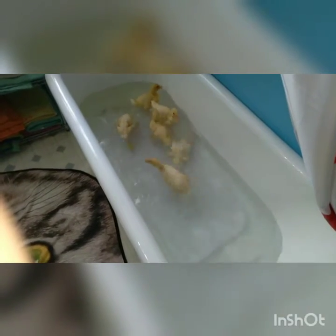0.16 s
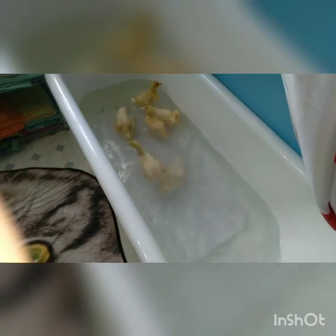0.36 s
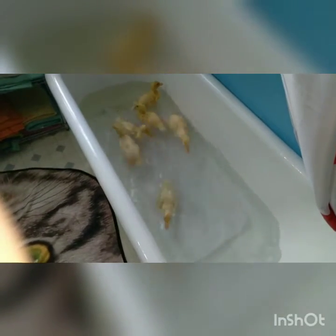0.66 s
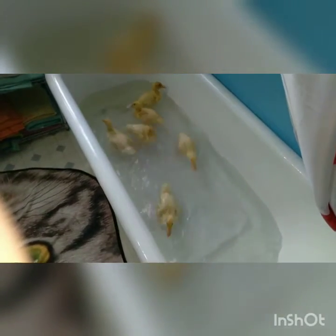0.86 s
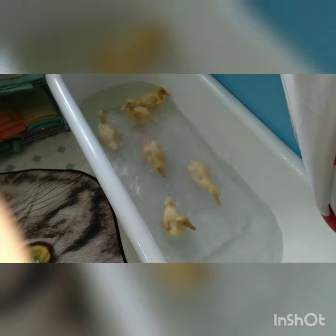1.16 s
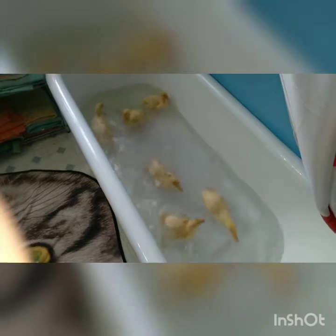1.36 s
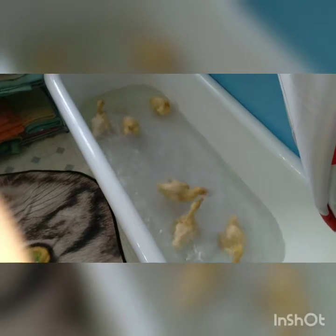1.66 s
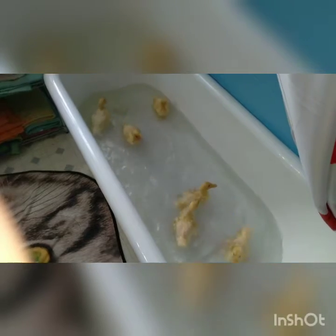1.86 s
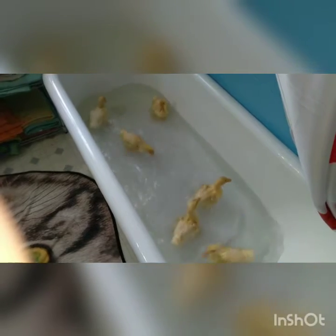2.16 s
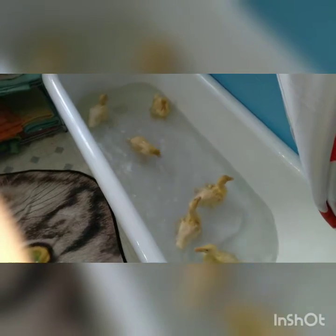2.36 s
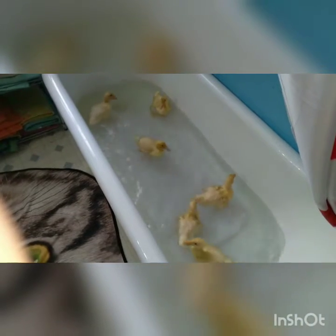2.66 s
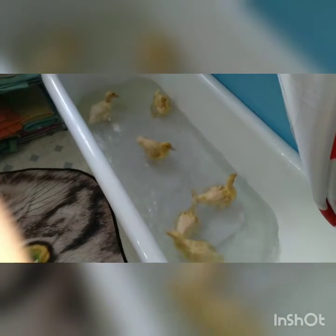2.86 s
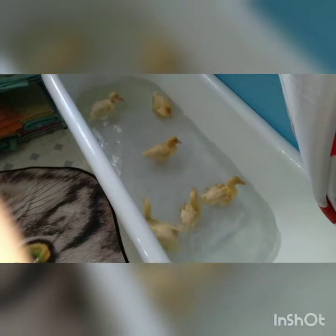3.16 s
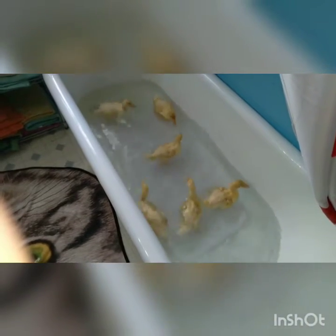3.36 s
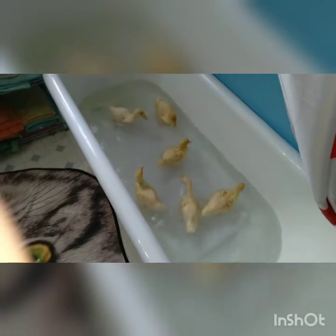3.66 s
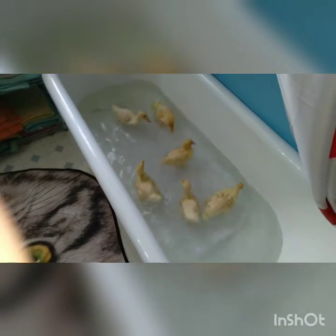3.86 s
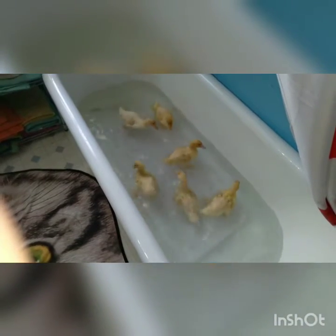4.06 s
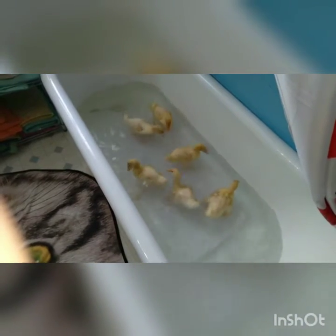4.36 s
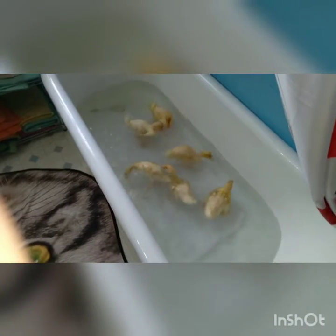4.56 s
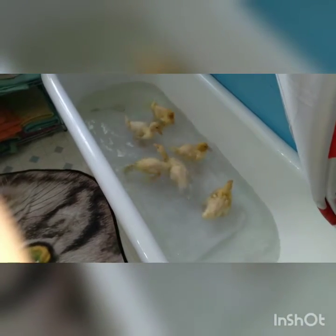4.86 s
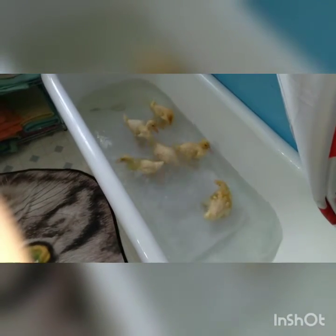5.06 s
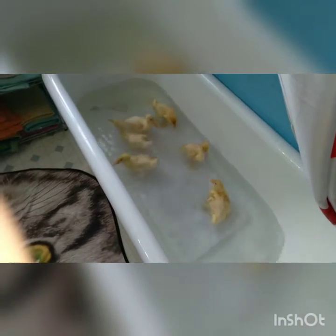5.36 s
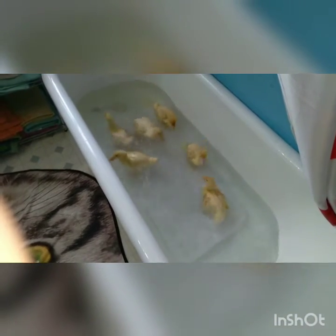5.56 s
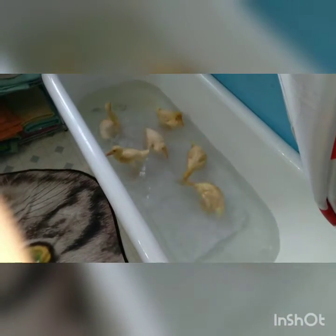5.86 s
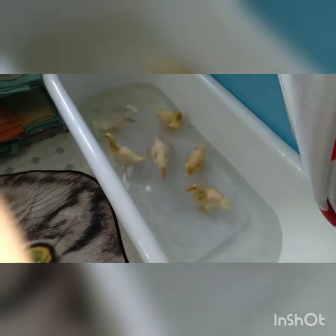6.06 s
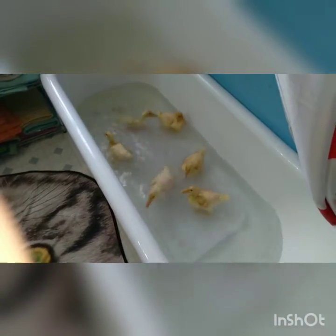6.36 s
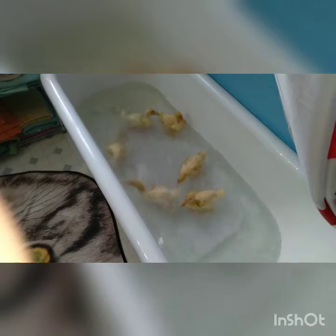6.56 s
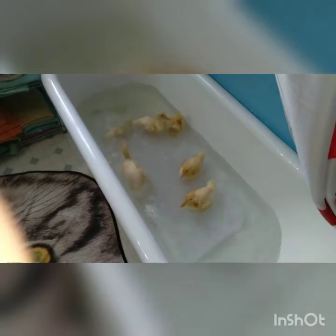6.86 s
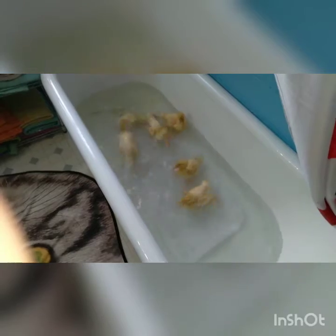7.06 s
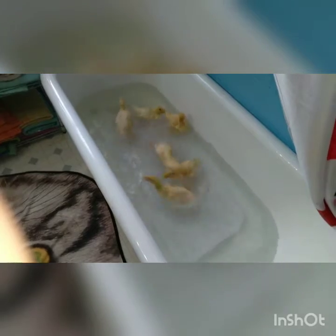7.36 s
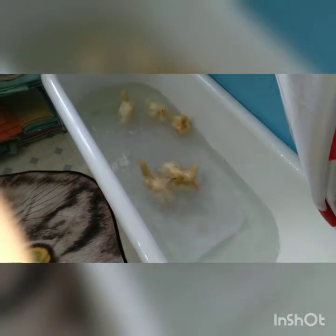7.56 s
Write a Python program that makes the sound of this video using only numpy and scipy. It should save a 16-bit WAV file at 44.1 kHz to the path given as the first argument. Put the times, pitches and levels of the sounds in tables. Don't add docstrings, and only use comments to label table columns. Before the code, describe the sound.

Thin whistled duckling peeps over lively paddling, with crackling spray, bubbly gurgles and droplets in a bathtub, echoing briefly off enamel and tile.

```python
import sys
import numpy as np
from scipy import signal
from scipy.fft import rfft, irfft
from scipy.io import wavfile

SR = 44100
rng = np.random.default_rng(int(sys.argv[2]) if len(sys.argv) > 2 else 0)


def decibels_to_gain(level_db):
    exponent = np.asarray(level_db, float) / 20
    return 10 ** exponent


def generate_wav(signal):
    frames = np.transpose(np.atleast_2d(signal))
    scaled = np.clip(frames, -1, 1) * 32767
    pcm = np.round(scaled).astype(np.int16)
    wavfile.write(sys.argv[1], SR, pcm)


N = 339646

# [Hz, dB per Hz]
HUSH_SPECTRUM = [(18, -58), (30, -4.5), (221, -2), (394, -11.5), (666, -14), (1190, -38), (12000, -45),
                 (16000, -53)]
HUSH_DB = -69.5
# [Hz, dB per Hz]
SPRAY_SPECTRUM = [(880, -8), (1500, -6.5), (2390, 4.5), (2830, -27), (3180, 4), (5020, -6), (10200, 0),
                  (13100, -12), (15100, -13), (16000, -100)]
# [Hz, 0 to 1]
LEFT_RIGHT_LIKENESS = [(100, 0.72), (250, 1), (500, 0.59), (1000, 0.033), (4000, 0.0077)]
# [Hz, Hz, dB]
TUB_WALL_MODES = [(97, 42, -18), (155, 21, 3), (208, 23.5, -2.5), (282, 180, -11)]
# [Hz, s]
ROOM_T60 = [(200, 0.33), (1000, 0.35), (3000, 0.22), (10000, 0.098)]
# [s, dB, dB]
TUB_BOUNCES = [
    (.0041, -18, -7),
    (.0093, -16, -7),
    (0.0161, -10, -16),
]
# [Hz, dB]
PORT_COLOUR = [(60, 5), (95, 1.5), (150, 0), (240, 1), (380, 1), (600, 0.5), (950, 1), (1500, -4),
               (2380, -5.5), (3770, -0.5), (5980, 4), (9470, -4), (15000, -2.5)]
PORT_CUTOFF_HZ = 16100

# [s, dB, s]
SHOVES = [(0.06, -38.5, 0.15), (0.81, -42, 0.094), (1.46, -40.5, 0.24), (2.38, -60.5, 0.11),
          (3.26, -49, 0.16), (4.87, -66.5, 0.23), (6.02, -56, 0.066), (6.24, -45.5, 0.097),
          (6.57, -36.5, 0.033), (7.05, -49, 0.4), (7.27, -51.5, 0.056), (7.44, -44, 0.096)]
SHOVE_FADE_DB_PER_S, STILL_DB = 77.5, -79
# [s, dB, s]
KICKS = [(0.04, -38, 0.32), (.11, -41.5, .01), (0.23, -34.5, 0.027), (.39, -42.5, 0.014), (0.476, -42, .01),
         (.65, -38, .01), (0.71, -30.5, 0.11), (.82, -51, 0.15), (1.02, -40, 0.044), (1.24, -31.5, 0.05),
         (1.37, -30.5, 0.52), (1.52, -36, 0.14), (1.72, -37.5, 0.054), (2.0, -43.5, 0.18), (2.35, -49.5, 1),
         (2.63, -56.5, 0.15), (2.89, -47.5, 0.16), (3.05, -40, 0.064), (3.135, -34.5, 0.052),
         (3.19, -51, 0.037), (3.31, -42, 0.099), (3.39, -68.5, 0.08), (3.72, -55.5, 0.062),
         (3.9, -46, 0.018), (4.12, -54, 0.06), (4.29, -53.5, .06), (4.425, -67, 0.012), (4.55, -57.5, 0.12),
         (4.68, -45.5, 0.06), (4.84, -36, 0.022), (5.06, -35.5, 0.0054), (5.3, -41.5, 0.2),
         (5.55, -43.5, 0.1), (5.995, -45.5, 0.048), (6.08, -54, .05), (6.18, -40, 0.088),
         (6.38, -38, 0.012), (6.5, -39.5, 0.18), (6.56, -31, 0.011), (6.66, -35, 0.3), (6.72, -32, 0.033),
         (6.84, -29.5, 0.016), (6.95, -35.5, .1), (7.05, -48, 0.15), (7.13, -35.5, 0.049),
         (7.25, -38, 0.049), (7.35, -37, 0.23), (7.45, -33.5, 0.11), (7.58, -37.5, 0.055)]
KICK_FADE_DB_PER_S = 77
# [s, dB, Hz]
CHURN = [(0, -42, 660), (0.95, -44, 910), (1.33, -38.5, 1040), (1.78, -41.5, 900), (2.08, -68.5, 890),
         (2.87, -99, 1200), (3.15, -43.5, 910), (3.42, -53.5, 905), (3.7, -55.5, 905), (3.82, -67, 1320),
         (4.52, -76, 1390), (5.1, -57, 1120), (5.36, -51, 1210), (5.93, -70.5, 1410), (6.1, -46, 800),
         (6.4, -58, 1000), (6.63, -44, 884), (7.7, -39, 1070)]
MIST_DB, MIST_FOLLOWS = -45, 0.99
# [s, dB, Hz]
FLOOR_BUMPS = [
    (4.85, -52.5, 96),
    (5.29, -46, 67.6),
]

# [s, dB, Hz]
DROPLETS = [(0.2304, -20, 8300), (0.3903, -24.5, 4090), (0.474, -23.5, 6250), (0.647, -16.5, 6800),
            (0.706, -19, 8000), (1.5225, -5, 7100), (1.725, -16, 7540), (1.8304, -20, 4260),
            (1.9203, -21.5, 8600), (2.3522, -31, 3850), (3.047, -23, 7140), (3.1278, -18, 7800),
            (3.905, -24.5, 7550), (4.4223, -38, 8600), (4.5524, -31, 8400), (5.0963, -11, 7950),
            (5.194, -20, 12700), (5.9897, -38, 4030), (6.0753, -22.5, 7750), (6.1779, -37, 8400),
            (6.8997, -15, 7400), (7.127, -17.5, 8650), (7.247, -15, 13800)]
# [s, dB]
BEADS = [(0.049, -15.5), (0.2344, -25), (0.283, -18), (0.9213, -46), (1.472, -16.5), (1.767, -22),
         (2.276, -28), (3.697, -35.5), (4.8319, -6), (4.984, -20.5), (5.0285, -5), (5.1386, -19.5),
         (5.34, -14.5), (5.381, -17), (5.481, -22), (5.5684, -26), (5.649, -28), (6.1765, -14),
         (6.242, -19.5), (6.557, -24), (6.651, -13.5), (6.719, -14), (6.8338, -10), (6.865, -33),
         (7.2467, -8), (7.568, -19)]
BEAD_HZ, BEAD_SPREAD = 9930, 0.1
# [s, dB, Hz]
TICKS = [(0.5257, -24, 10200), (0.5374, -28, 11700), (0.9705, -29, 8130), (1.2371, -20, 4050),
         (1.3523, -23, 8500), (2.4239, -33.5, 11900), (2.6219, -37, 8250), (2.8794, -36, 8520),
         (3.1911, -23.5, 10000), (3.4565, -41, 8610), (3.6164, -35.5, 5640), (3.6491, -40, 10800),
         (3.7364, -32, 5960), (3.9394, -28.5, 5920), (4.0292, -46, 13800), (4.14, -31, 5610),
         (4.3969, -46, 6900), (4.4643, -43, 8750), (4.5178, -37, 7100), (4.5984, -35.5, 11100),
         (4.6743, -35, 11700), (4.7666, -33.5, 11400), (5.2924, -33, 8500), (5.7196, -32, 5970),
         (5.8381, -38.5, 10500), (5.9364, -38, 7500), (6.0586, -28, 7920), (6.1135, -36, 10300),
         (6.305, -31, 10700), (6.3463, -29.5, 10200), (6.4975, -23, 7700), (7.04, -20, 10200),
         (7.208, -19.5, 4840), (7.2994, -34, 4530), (7.343, -28, 8550), (7.5194, -23, 9400),
         (7.585, -19.5, 10200)]
# [s, dB, Hz]
SLAPS = [(0.113, -18, 2270), (0.226, -17.5, 2010), (0.2859, -20, 2500), (0.4738, -20.5, 1980),
         (0.5386, -24.5, 2440), (0.6445, -33, 2370), (0.6782, -17.5, 2150), (0.9743, -38, 1950),
         (1.289, -13, 1720), (1.65, -20, 2480), (3.127, -22, 2150), (3.1415, -27, 1880),
         (3.1788, -19.5, 2480), (3.1923, -29, 2340), (3.3055, -23, 2680), (3.389, -31, 3150),
         (5.074, -29, 1900), (5.103, -29, 1900), (5.34, -26, 1500), (3.087, -27, 1800), (5.9898, -29, 2520),
         (6.1758, -39, 2580), (6.3802, -28, 2540), (6.4962, -29, 1240), (6.555, -21.5, 1350),
         (6.7096, -21, 1210), (6.8324, -31, 1300), (6.858, -18, 1700), (6.942, -20, 1760),
         (7.2474, -26, 2350), (7.3423, -18.5, 2900)]
# [s, dB, Hz]
PLOPS = [(0.031, -30, 551), (0.11, -28, 1140), (0.229, -31.5, 672), (0.284, -30, 1450), (0.311, -28, 1560),
         (0.647, -30.5, 595), (0.688, -24, 1470), (0.88, -30.5, 726), (1.289, -27, 1595), (1.417, -33, 696),
         (1.64, -29.5, 1310), (2.348, -43, 683), (2.459, -36, 602), (3.076, -39, 1106), (3.146, -31, 982),
         (3.105, -42, 1000), (3.17, -35, 946), (3.25, -39, 1640), (3.456, -45, 895), (3.506, -36, 917),
         (3.869, -44, 1630), (5.383, -27.5, 1800), (5.338, -39, 807), (5.48, -41.5, 704),
         (6.178, -30.5, 968), (6.378, -35, 934), (6.555, -34, 1015), (6.854, -27.5, 1370),
         (6.945, -30, 1615), (7.067, -29.5, 1275), (7.203, -31, 1350), (7.247, -31, 585),
         (7.348, -28.5, 1200), (7.407, -34.5, 685), (7.495, -36, 2430)]
DRIPS_PER_S, DRIP_OVER_CHURN_DB = 14, 3
# [s, s, Hz, Hz, dB]
WARBLES = [(0.354, 0.25, 603, 609, -49.5), (2.351, 0.064, 4340, 4070, -56), (2.454, 0.078, 591.6, 896, -52),
           (3.21, 0.027, 524, 650, -50.5), (3.3, 0.048, 965, 802, -45.5), (3.375, 0.02, 853, 1020, -46),
           (3.575, 0.11, 301, 447, -60.5), (3.635, 0.051, 853, 844, -56), (3.738, 0.027, 1310, 1340, -52),
           (5.045, 0.05, 1233, 1183, -51), (4.23, 0.13, 331, 327, -68), (4.78, .11, 679, 707, -56),
           (5.1, 0.091, 533, 497, -54), (5.189, 0.033, 926, 1360, -48.5), (5.479, 0.051, 703, 724, -51.5),
           (6.44, 0.07, 1286, 1190, -44), (6.561, 0.104, 769, 691, -41.5), (7.063, 0.065, 1197, 1774, -39),
           (7.222, 0.079, 1008, 592, -42), (7.483, 0.11, 689, 701, -42), (7.485, 0.02, 1300, 1750, -36),
           (5.365, .025, 1050, 1400, -48.5), (5.405, 0.032, 920, 1030, -55), (4.981, 0.027, 800, 960, -57),
           (5.03, .025, 1790, 2400, -47), (6.859, .03, 620, 602, -39), (5.977, 0.14, 697, 623, -54),
           (3.268, .03, 710, 1610, -47), (3.185, .015, 570, 470, -47), (3.475, .02, 1040, 910, -51)]

# [s, s, Hz, Hz, dB]
SQUEAKS = [
    (.048, .012, 2800, 2310, -34),
    (.086, .018, 2900, 2410, -32),
    (2.102, .016, 2600, 1910, -42),
    (2.304, .012, 2550, 2010, -41),
    (3.036, .014, 2300, 1510, -48),
    (3.041, .022, 2310, 3210, -47),
    (4.298, .017, 2850, 1910, -45),
    (6.65, .012, 2250, 2750, -36),
]
# [s, s, Hz, dB]
PIPS = [(0.006, 0.028, 3361, -19.5), (1.038, 0.033, 2880, -29), (1.995, .04, 3421, -45),
        (2.084, 0.038, 3421, -47), (2.202, 0.046, 3321, -50), (2.603, 0.042, 3381, -51),
        (2.872, .03, 3481, -54), (3.13, 0.027, 3061, -31), (4.112, .03, 3481, -54),
        (6.158, 0.046, 2681, -38), (6.662, .028, 3461, -30), (7.468, 0.012, 2041, -28),
        (7.577, 0.016, 2880, -27.5)]
PIP_BEND_HZ_PER_S = 6160
# [s, s, Hz, dB, share
PEEPS = [(0.012, 0.048, 2756, -28, 0.36), (0.051, 0.052, 3000.0, -30.5, 1.5),
         (0.229, 0.058, 3130, -34, 0.51), (0.758, 0.065, 2970, -27, 0.46),
         (0.996, 0.056, 3534, -18, 0.12), (1.212, 0.052, 2620, -28.5, 0.6),
         (1.347, 0.056, 3027, -19, 0.38), (1.538, 0.062, 3350, -15, 0.5),
         (1.896, 0.038, 2395, -42, 0.25), (1.966, 0.044, 2770, -39, 0.13),
         (2.047, 0.032, 2600.0, -32.5, 0.17), (2.187, 0.04, 2543, -30, 0.57),
         (2.252, 0.0342, 2595, -37.5, 0.18), (2.254, 0.058, 3445, -40.5, 0.6),
         (2.584, 0.069, 2710, -44, 0.78), (2.756, 0.048, 3020, -43, 0.3),
         (2.788, 0.059, 2950, -37.5, 0.54), (2.946, 0.066, 2574, -37.5, 0.8),
         (2.973, 0.036, 3210, -42, 0.6), (3.089, 0.032, 2850, -31.5, 0.2),
         (3.532, 0.089, 2570, -48, 0.87), (3.654, 0.057, 2864, -35, 0.15),
              (3.707, 0.074, 2974, -35.5, 0.72), (3.878, 0.068, 3066, -35, 0.68),
              (4.071, 0.063, 2797, -28.5, 0.72), (4.241, 0.064, 3024, -31.5, 0.17),
              (4.439, 0.063, 2320.0, -43.5, 0.67), (4.62, 0.056, 3170, -39, 0.53),
              (4.639, 0.042, 2540.0, -40.5, 0.67), (4.708, 0.053, 2663, -36, 0.79),
              (4.895, 0.056, 2857, -38, 0.75), (5.154, 0.053, 2850, -35, 0.8),
              (5.261, 0.051, 2696, -37, 0.44), (5.446, 0.056, 2727, -31, 0.16),
              (5.48, 0.066, 2880, -35.5, 0.28), (5.634, 0.041, 2394, -39, 0.18),
              (5.671, 0.066, 3037, -34.5, 0.74), (5.82, 0.042, 2663, -37, 0.29),
              (5.838, 0.054, 3180, -33.5, 0.53), (5.935, 0.06, 2570, -42, 0.22),
              (6.64, 0.056, 2850, -36.5, 0.5), (6.857, 0.04, 2380.0, -33.5, 0.15),
              (7.15, 0.069, 2850, -34, 0.61), (7.336, 0.026, 2970, -31, 0.37)]
REST_HZ = 1940
# [Hz, dB]
BEAK = [(1400, -13), (2100, -2), (2600, -4), (3300, -8.5), (4300, -27), (5500, 4.5), (6800, 3), (10000, 11)]
BASIN_HZ, BASIN_WIDTH_HZ, BASIN_DB = 2320, 59, -10
VOICE_WET_DB = -0.5


def rms_one(x):
    return x / np.sqrt(np.mean(x ** 2) + 1e-20)


def at_hz(points, hz):
    table_hz, values = np.array(points).T
    return np.interp(np.log(hz), np.log(table_hz), values)


def in_time(rows):
    s, *columns = np.transpose(rows)
    return [np.interp(np.arange(N) / SR, s, c) for c in columns]


def drift(rate_hz):
    r = np.exp(-80 * np.pi * rate_hz / SR)
    white = rng.standard_normal(N // 40 + 2002)
    slow = signal.lfilter([1], [1, -2 * r, r * r], white)[2000:]
    return np.interp(np.arange(N) / 40, np.arange(len(slow)), rms_one(slow))


def resonate(x, hz, width_hz):
    r = np.exp(-np.pi * width_hz / SR)
    top = np.array([1, 0, -1]) * (1 - r * r) / 2
    return signal.lfilter(top, [1, -2 * r * np.cos(2 * np.pi * hz / SR), r * r], x + 1e-18)


def add(track, s, sound):
    i = round(s * SR)
    track[..., i:i + sound.shape[-1]] += sound[..., :N - i]


def banded_noise(spectrum, patchy_db, level_db):
    out, power, together = 0, 0, drift(8.1)
    edges = 21000 / 2 ** np.arange(0, np.log2(21000 / spectrum[0][0]), .5)[::-1]
    white = rng.standard_normal((2, 2, N))
    for k, (low, high) in enumerate(zip(edges, edges[1:])):
        band = signal.butter(2, [low, high], "band", fs=SR, output="sos")
        mid, side = signal.sosfilt(band, white[k % 2])
        hz = np.sqrt(low * high)
        alike = np.clip(at_hz(LEFT_RIGHT_LIKENESS, hz), -1, 1)
        flicker_db = patchy_db * (0.51 * together + drift(15.1))
        gain = decibels_to_gain(at_hz(spectrum, hz) + level_db(hz) + flicker_db)
        out = out + gain * (np.sqrt(1 + alike) * mid + np.sqrt(1 - alike) * side * [[1], [-1]])
        power += decibels_to_gain(2 * at_hz(spectrum, hz)) * 4 * (high - low) / SR
    return out / np.sqrt(power)


def room_hush():
    return banded_noise(HUSH_SPECTRUM, 1.5, lambda hz: HUSH_DB)


def swells(rows, fade_db_per_s, under_db):
    t = np.arange(0, N + 64, 64) / SR
    total = 0
    for s, db, build_s in rows:
        climb_db = 20 * (s - t) / max(build_s, 1e-3)
        total = total + decibels_to_gain(2 * (db - np.maximum(climb_db, fade_db_per_s * (t - s))))
    return 10 * np.log10(np.interp(np.arange(N) / SR, t, total) + decibels_to_gain(2 * under_db))


def grains(per_s, spread_db):
    sizes = decibels_to_gain(spread_db * np.minimum(rng.exponential(1, N), 5)) * rng.choice([-1, 1], N)
    side = decibels_to_gain(rng.normal(0, 2.6, N) * [[1], [-1]])
    return sizes * (rng.random(N) < per_s / SR) * side


def bubbling(per_s, low_hz, high_hz, cycles, spread_db, common_hz, octave_db):
    clicks = grains(per_s * decibels_to_gain(5.0 * drift(12)), spread_db)
    dealt = rng.integers(0, 11, N)
    out = 0
    for k, hz in enumerate(np.geomspace(low_hz, high_hz, num=11)):
        gain = decibels_to_gain(octave_db * np.abs(np.log2(hz / common_hz)))
        out = out + resonate(clicks * (dealt == k) * gain, hz, hz / cycles)
    return rms_one(out)


def tub_hum(surge_db):
    push = rng.standard_normal(N) + .15 * rng.standard_normal((2, N))
    modes = sum(decibels_to_gain(db) * resonate(push, hz, w) for hz, w, db in TUB_WALL_MODES)
    return decibels_to_gain(surge_db + 0.4) * rms_one(modes)


def water():
    gurgle_db, common_hz = in_time(CHURN)
    surge_db = swells(SHOVES, SHOVE_FADE_DB_PER_S, STILL_DB)
    spray_db = swells(KICKS, KICK_FADE_DB_PER_S, MIST_DB + MIST_FOLLOWS * (gurgle_db + 26.0))
    gurgle = decibels_to_gain(gurgle_db - 4.5) * bubbling(1300, 375.4, 2036, 9.2, 5.0, common_hz, octave_db=-4.5)
    crackle = decibels_to_gain(spray_db - 9.0) * bubbling(2500, 3500, 11540, 4.9, 4.8, 11500, octave_db=-11.0)

    def hiss_db(hz):
        bright = at_hz([(1500, 0.6), (7000, 0.71)], hz)
        return 3.0 + bright * spray_db + (1 - bright) * (gurgle_db + 2.0)
    return tub_hum(surge_db) + banded_noise(SPRAY_SPECTRUM, 3.21, hiss_db), gurgle + crackle


def thumps():
    out, t = np.zeros(N), np.arange(round(.3 * SR)) / SR
    for s, level_db, hz in FLOOR_BUMPS:
        shape = np.exp(-t / 0.047) * (1 - np.exp(-t / 0.015))
        add(out, s, decibels_to_gain(level_db - 3.0) * np.sin(2 * np.pi * hz * t) * shape)
    return out


def cracks(drops, width_hz, body_db, snap_s, spill_s, spill):
    out, t = np.zeros((2, N)), np.arange(round(.06 * SR)) / SR
    shape = (1 - np.exp(-t / 0.00077)) * (np.exp(-t / snap_s) + spill * np.exp(-t / spill_s))
    for (s, level_db, hz), noise in zip(drops, rng.standard_normal((len(drops), 2, len(t)))):
        burst = noise * shape
        crack = resonate(burst, hz, width_hz) + decibels_to_gain(body_db) * resonate(burst, 2700, 5300)
        add(out, s - .001, decibels_to_gain(level_db) * crack / np.abs(crack).max())
    return out


def droplets():
    beads = [(s, db, BEAD_HZ * (1 + BEAD_SPREAD * rng.standard_normal())) for s, db in BEADS]
    bursts = decibels_to_gain(-3.0) * cracks(DROPLETS + beads, 1200, -23.5, 0.0016, 0.032, 0.12)
    ticks = decibels_to_gain(-1.5) * cracks(TICKS, 2500, -24, 0.0016, 0.034, 0.11)
    slaps = decibels_to_gain(-0.44) * cracks(SLAPS, 710, -15, 0.0019, 0.027, 0.28)
    return bursts + ticks + slaps


def drips():
    when, size, luck = rng.random((round(DRIPS_PER_S * N / SR), 3)).T
    s = when * (N / SR - .1)
    churn_db = np.interp(s, *np.transpose(CHURN)[:2])
    level_db = churn_db + DRIP_OVER_CHURN_DB + 8 * (luck - .5)
    return list(zip(s + 0.011, level_db, 550 * 4.0 ** size))


def plops(cycles=13, climb=0.00746):
    out, bubbles = np.zeros((2, N)), PLOPS + drips()
    for (s, level_db, hz), pan_db in zip(bubbles, rng.normal(0, 1.8, len(bubbles))):
        turns = np.arange(round(5 * cycles / hz * SR)) * hz / SR
        ring = np.sin(2 * np.pi * turns * (1 + climb * turns / 2))
        shape = np.exp(-turns / cycles * 1.05) * (1 - np.exp(-turns / 0.5))
        add(out, s - .002, decibels_to_gain(level_db - 3.0) * ring * shape * decibels_to_gain([[pan_db], [-pan_db]]))
    return out


def warbles():
    out, wobble = np.zeros(N), 0.71 + drift(93)
    for s, length, start_hz, end_hz, level_db in WARBLES + SQUEAKS:
        hz = np.geomspace(start_hz, end_hz, round(length * SR))
        glide = np.sin(2 * np.pi * np.cumsum(hz) / SR)
        add(out, s, decibels_to_gain(level_db) * glide * np.hanning(len(hz)) ** 0.25)
    return out * wobble


def calls():
    every = []
    for s, length, top_hz, level_db, slide_share in PEEPS:
        climb_hz = top_hz - REST_HZ
        every.append((s, length, top_hz, level_db, climb_hz, slide_share * climb_hz))
    for s, length, top_hz, level_db in PIPS:
        climb_hz = PIP_BEND_HZ_PER_S * length
        every.append((s, length, top_hz, level_db, climb_hz, 0.59 * climb_hz))
    return every


def peeps(roundness=2.2, swell=0.43, lead=0.12, trail=.26, fade_db=-3, strain=.5, focus=0.22):
    out = np.zeros(N)
    for s, length, top_hz, level_db, climb_hz, slide_hz in calls():
        u = np.arange(-lead, 1 + trail, 1 / (length * SR))
        rise, fall = [max(hz, 1) ** (1 / roundness) for hz in (climb_hz, slide_hz)]
        hz = np.maximum(top_hz - np.abs((rise + fall) * u - rise) ** roundness, 900)
        phase = 2 * np.pi * np.cumsum(hz) / SR
        overtone = decibels_to_gain(strain * (level_db + 38.0) - 27.0) * (hz / top_hz) ** 3
        voice = 0
        for k in (1, 2, 3):
            voice = voice + overtone ** (k - 1) * decibels_to_gain(at_hz(BEAK, k * hz)) * np.sin(k * phase)
        shape = np.sin(np.linspace(0, np.pi, len(u))) ** swell * decibels_to_gain(fade_db * u)
        shape = shape * (hz / top_hz) ** (focus * max(level_db + 35, 0))
        add(out, max(s - lead * length, 0), decibels_to_gain(level_db + 2.5) * shape * voice)
    out = out * decibels_to_gain(2 * drift(60))
    return out + decibels_to_gain(BASIN_DB) * resonate(out, BASIN_HZ, BASIN_WIDTH_HZ)


def tub_echoes(x):
    out = np.zeros((2, N))
    for s, left_db, right_db in TUB_BOUNCES:
        add(out, s, x * decibels_to_gain([[left_db], [right_db]]))
    return out


def bathroom(x, onset_s=0.00018):
    t, edges = np.arange(round(.7 * SR)) / SR, 60 * 2 ** np.arange(0, 8.6, 1)
    white, tail = rng.standard_normal((2, len(t))), 0
    tub_decay = 0.21 * np.exp(-t / 0.058)
    for low, high in zip(edges, np.append(edges[1:], 20000)):
        band = signal.sosfilt(signal.butter(2, [low, high], "band", fs=SR, output="sos"), white)
        room_decay = decibels_to_gain(-60 * t / at_hz(ROOM_T60, np.sqrt(low * high)))
        tail = tail + band * (room_decay + tub_decay)
    tail = tail * (1 - np.exp(-(t / onset_s) ** 2))
    return signal.fftconvolve(x, tail / np.sqrt(np.sum(tail ** 2) / 2), axes=1)[:, :N]


def scene():
    bed, near = water()
    voices = np.tile(peeps(), (2, 1))
    splashes = droplets() + plops() + warbles() + near
    wet = bathroom(decibels_to_gain(VOICE_WET_DB) * voices + decibels_to_gain(-4.5) * splashes)
    direct = decibels_to_gain(-1) * (voices + tub_echoes(voices))
    return direct + decibels_to_gain(-0.5) * splashes + wet + bed + thumps() + decibels_to_gain(-4.0) * room_hush()


def low_pass(x):
    return signal.sosfilt(signal.butter(12, 17030, fs=SR, output="sos"), x)


def record(dry):
    hz = np.maximum(np.arange(N // 2 + 1) * SR / N, 1)
    colour = decibels_to_gain(at_hz(PORT_COLOUR, hz) / 2 * [[1], [-1]])
    ports = colour / (1 + (50 / hz) ** 2.55) * (hz < PORT_CUTOFF_HZ)
    mix = irfft(rfft(dry) * ports, N)
    return low_pass(mix)


dry = scene()
out = record(dry)
generate_wav(out)
```